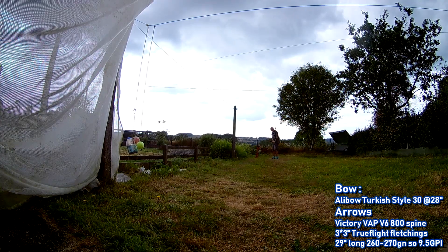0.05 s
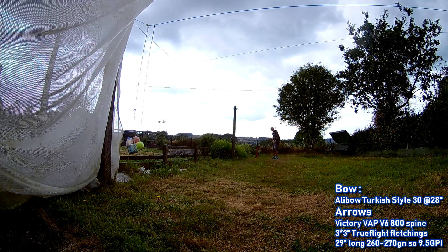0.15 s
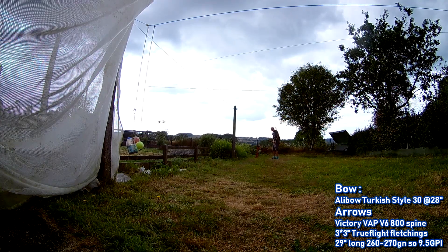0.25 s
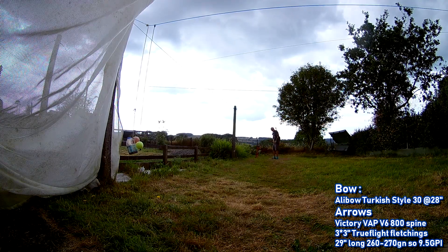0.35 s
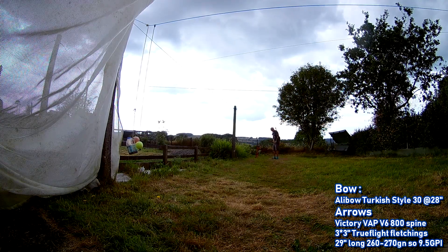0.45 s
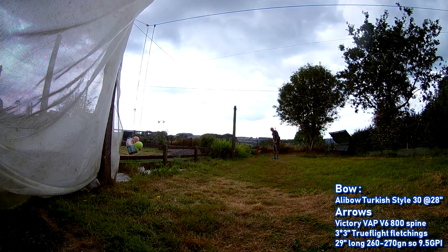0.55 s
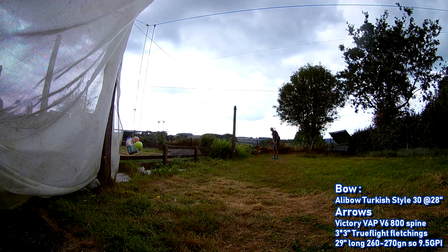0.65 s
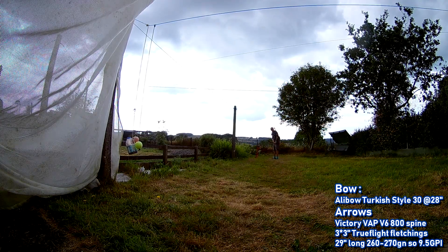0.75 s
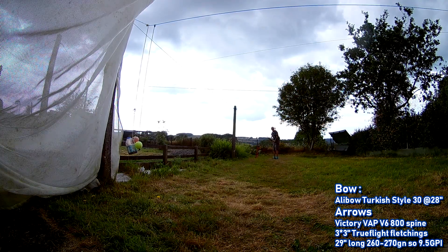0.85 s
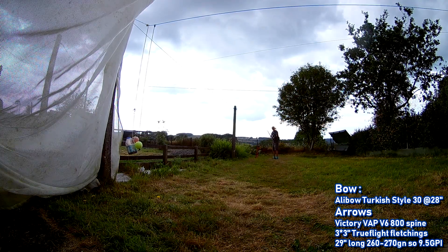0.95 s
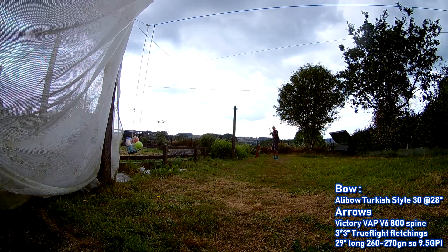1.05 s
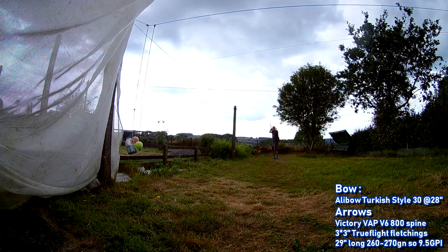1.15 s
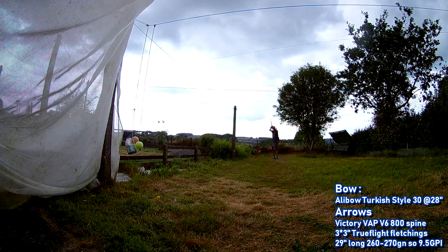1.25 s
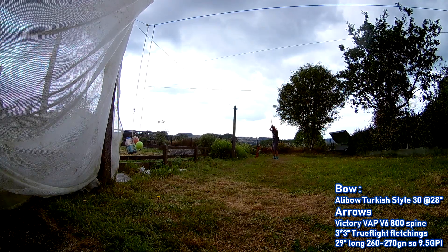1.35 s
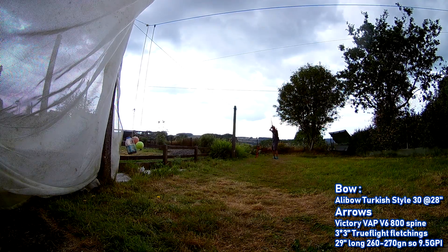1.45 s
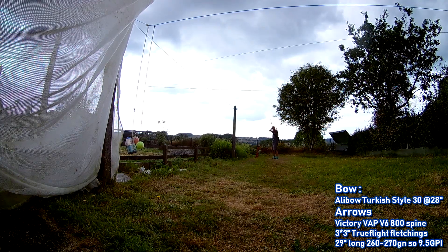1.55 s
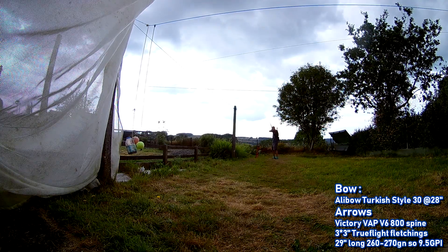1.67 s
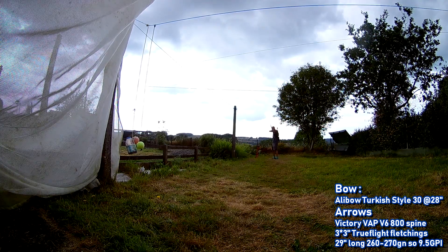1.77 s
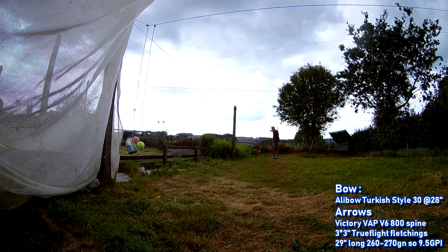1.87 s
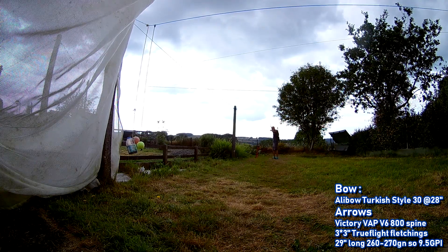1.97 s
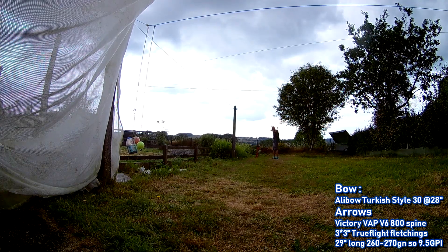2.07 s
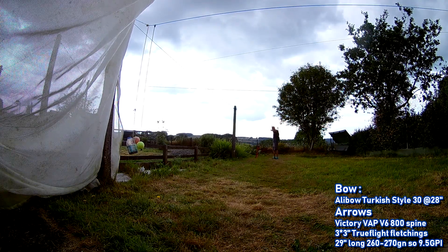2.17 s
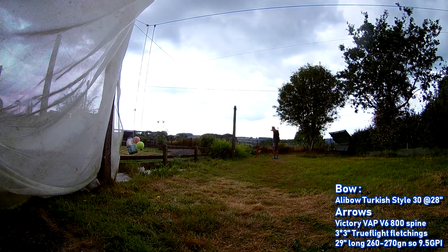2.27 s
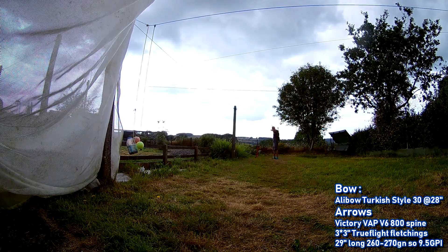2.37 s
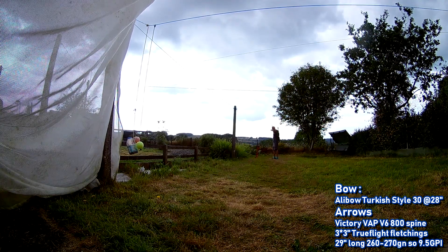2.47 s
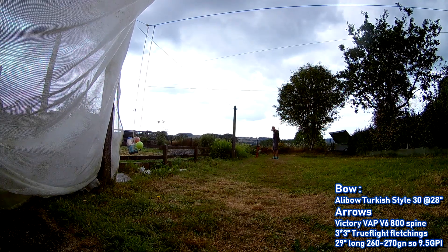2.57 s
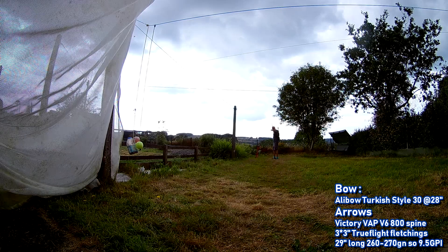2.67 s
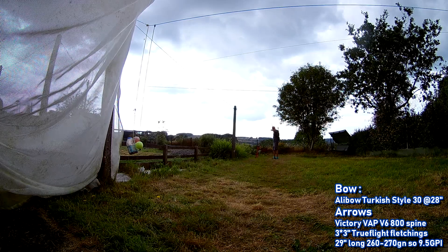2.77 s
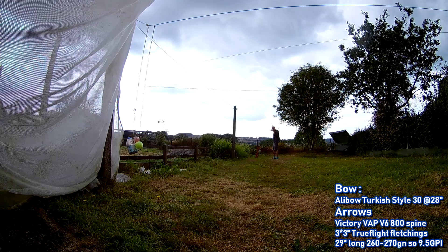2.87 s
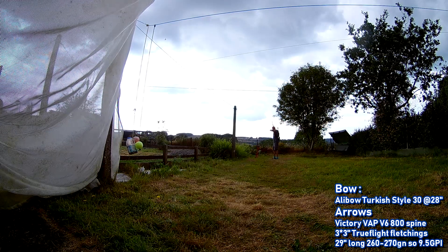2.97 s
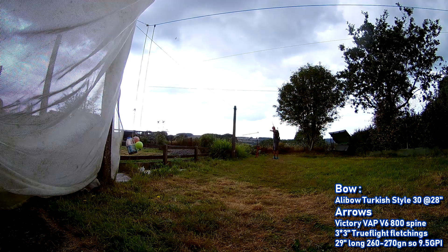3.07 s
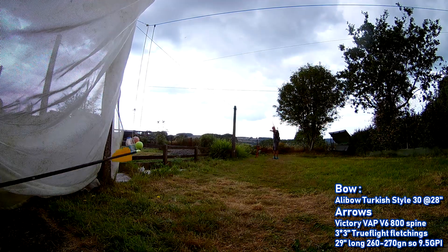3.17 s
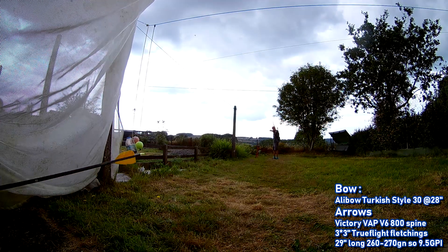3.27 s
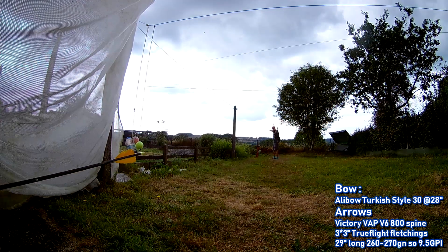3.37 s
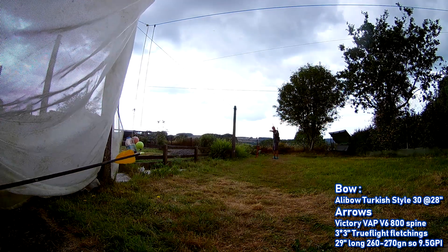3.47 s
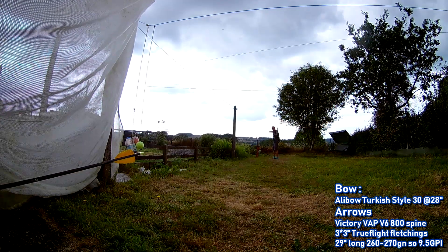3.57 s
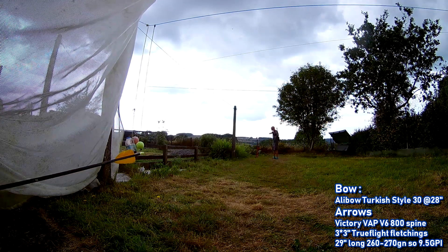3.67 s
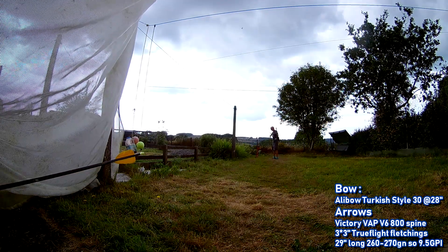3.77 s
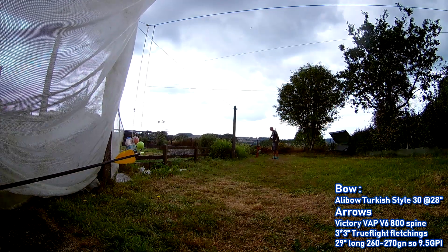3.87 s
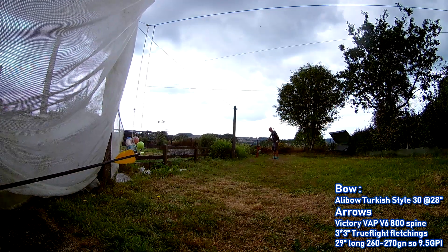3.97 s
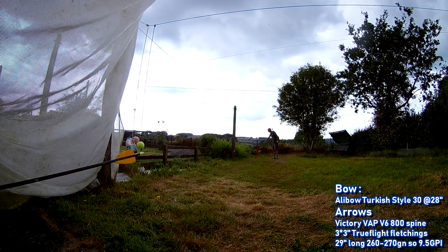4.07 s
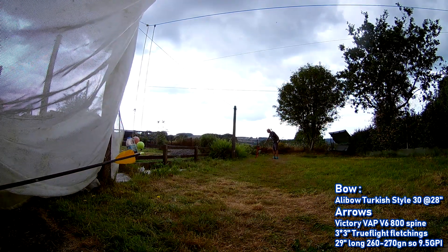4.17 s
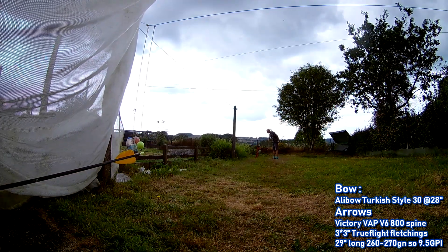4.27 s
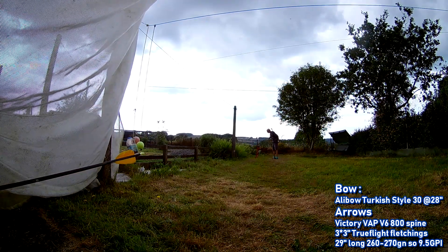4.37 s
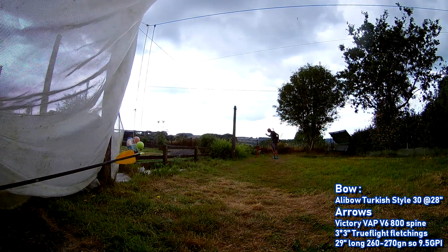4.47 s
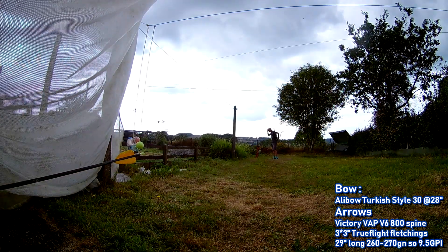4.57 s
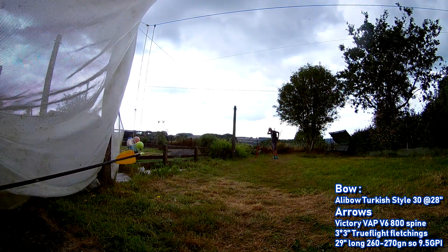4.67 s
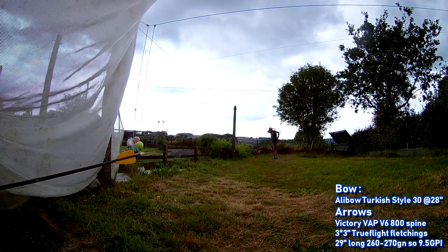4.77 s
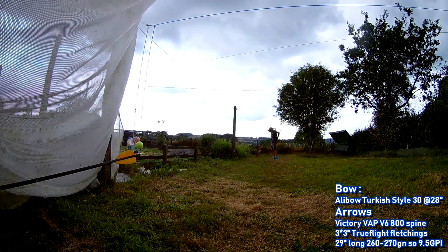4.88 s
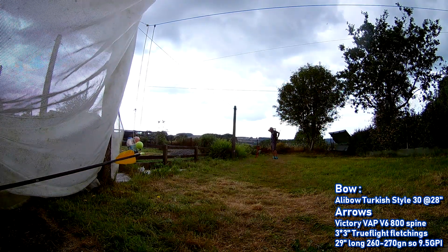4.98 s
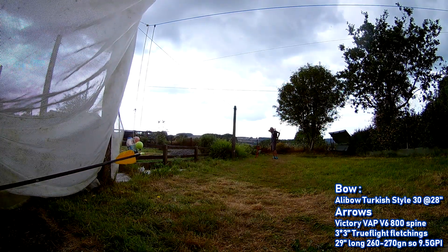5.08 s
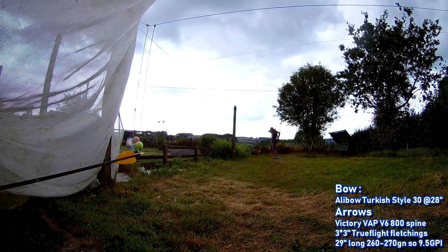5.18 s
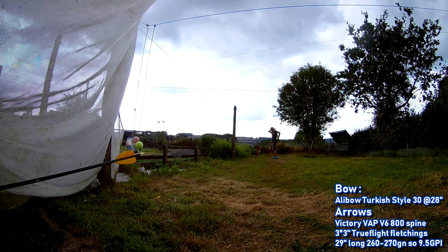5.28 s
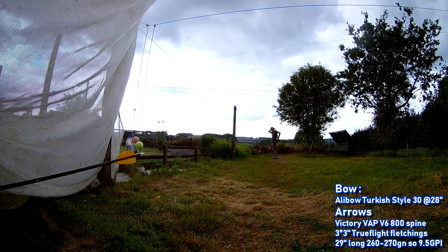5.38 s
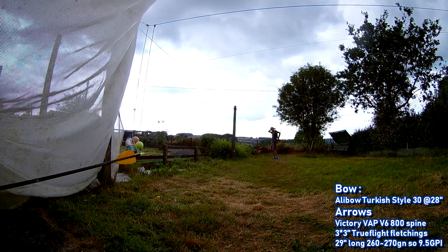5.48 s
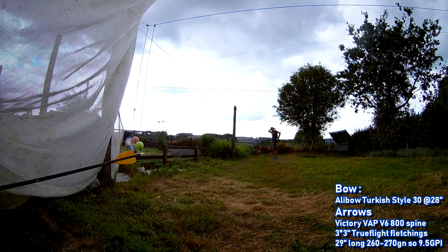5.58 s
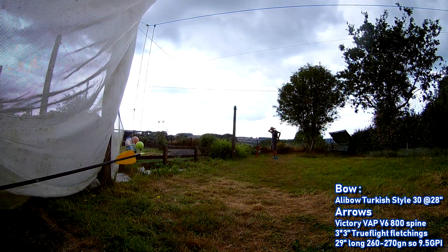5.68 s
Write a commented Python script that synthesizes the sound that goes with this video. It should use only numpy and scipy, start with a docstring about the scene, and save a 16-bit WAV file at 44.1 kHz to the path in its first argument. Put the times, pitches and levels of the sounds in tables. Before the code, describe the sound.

Outdoors, gusts buffet the microphone and fade; a far bow clacks softly and an arrow whirrs in, hitting a nearby target with a violent crack.

```python
"""Gusts rumble on the microphone in the first two seconds and die away, with a few low puffs later;
a distant road and a faint two-note bird go on throughout.
Near 3 s an archer at the far end of a garden looses: struck modes and noise bursts make the bow clack.
The feathers whirr closer as wavering tones and resonant noise that grow with nearness.
The arrow smacks into a target beside the microphone, a noise crack over ringing modes, and overloads it."""
import sys
import numpy as np
from scipy import signal
from scipy.fft import rfft, irfft
from scipy.io import wavfile

SR = 44100
rng = np.random.default_rng(int(sys.argv[2]) if len(sys.argv) > 2 else 0)


def to_wav(sig):
    """Store sig (one row per channel, or 1-D mono) as 16-bit WAV at the path in sys.argv[1].

    Samples outside -1..1 are clipped; the rate is SR.
    """
    pcm = np.clip(np.atleast_2d(sig), -1, 1) * 32767
    pcm = np.round(pcm).astype(np.int16)
    wavfile.write(sys.argv[1], SR, pcm.T)  # frames by channels


N = 252693
T = np.arange(N) / SR  # seconds

# Modes of the target and its stand; heavy parts start to move later.
# Each row: frequency in Hz, level in dB, t60 in seconds, lag after the hit in seconds.
TARGET_MODES = [(36.6, -18, 0.35, 0.012), (108.7, 9.5, 0.043, 0.0063), (88, -9, 0.15, 0.0052),
                (209, -0.5, 0.036, 0.0045), (280, -1.5, 0.078, 0.0053), (330, 5.5, 0.042, 0.00192),
                (413, -18, 0.093, 0.0045), (490, 3, 0.0314, .003), (621, -0.5, 0.044, 0.00059),
                (767, -2.5, 0.038, 0.00043), (982, 9, 0.018, 0.000535), (1220, -13, 0.09, 0.00044),
                (1266, -34, 0.37, 0.00084), (1660, -2, 0.03, 0.00051)]
# Point tearing through the face. Each row: frequency in Hz, relative level in dB.
CRACK_SPECTRUM = [(150, -6.5), (500, -3), (1000, -0.5), (1600, -3), (2050, -18), (2600, -11), (4000, -24),
                  (7000, -24), (11000, -43), (16000, -62)]
# Smack scattered by the garden. Each row: low edge in Hz, high edge in Hz, level in dB, t60 in seconds.
SCATTER_BANDS = [(40, 330, -20.5, 0.25), (198, 350, -22, 0.21), (500, 1660, -12, 0.095),
                 (497, 1540, -38, 0.8), (1900, 3800, -29.5, 0.13), (4200, 6300, -30.5, 0.1),
                 (7500, 8600, -43, .08)]
HIT_S, SCATTER_DELAY_S, ECHO_DELAY_S, ECHO_DB = 3.2015, 0.0032, 0.0145, -14.5

# Modes of the bow limbs. Each row: nominal frequency in Hz, relative level in dB, t60 in seconds.
BOW_MODES = [(220, -7, 0.12), (408, -4, .06), (604, 1, 0.097), (890, 4, 0.044), (1030, -3, 0.036),
             (1284, -2.5, 0.1), (1580, -2, 0.075), (1690, -11, .025)]
# Bright snap of string and nock. Each row: frequency in Hz, relative level in dB.
SNAP_SPECTRUM = [(1500, -8), (2400, -1), (2950, -7), (3600, 5), (4500, 1), (5100, -11), (6200, -8),
                 (7500, -23), (12000, -42)]
# String and shaft clattering on the bow. Each row: time in seconds, relative level in dB.
CLATTER_CONTACTS = [(2.9987, -1), (3.004, -4.5), (3.007, -4.5), (3.0125, -8), (3.0198, -3.5), (3.0243, -5),
                    (3.0278, -9)]
# The nock clicks off the string; bright levels set the snap against the ring of the limbs.
NOCK_S, NOCK_REL_DB, NOCK_BRIGHT_DB, CLATTER_BRIGHT_DB = 2.9822, -14.5, 3, -17
BOW_DB, BOW_WASH_DB = -28.0, -41.0

# Feather whistle. Each row: mean pitch in Hz, level at the hit in dB, time to go at half gain in seconds.
WHISTLE_TONES = [(526, -28, 0.0094), (883, -36.5, 0.068)]
# Air rushing past the feathers.
# Each row: centre in Hz, offset to half gain in Hz, relative level in dB.
FEATHER_RESONANCES = [(800, 860, -1), (3950, 600, -11), (6200, 350, -16)]
RUSH_DB, RUSH_SWELL_S = -41.5, 0.03

# Two-note bird calls. Each row: middle of the first note in seconds, its nominal pitch in Hz,
# its relative level in dB, relative level of the second note in dB.
BIRD_CALL_ROWS = [(.805, 5100, -55, -58), (1.215, 4800, -53, -60), (1.565, 5250, -56, -55),
                  (2.05, 5140, -55, -58), (2.475, 5220, -55, -59), (2.955, 5500, -52, -60),
                  (3.455, 5500, -51, -60), (3.87, 5030, -66, -54), (4.35, 5200, -56, -59),
                  (4.77, 5050, -55, -52), (5.29, 5100, -59, -54)]
NOTE_HALF_S, NOTE_GLIDE, NOTE_WARBLE = 0.06, 0.07, 0.049  # glide and rms warble: shares of the pitch
SECOND_NOTE_DELAY_S, SECOND_NOTE_PITCH_RATIO, BIRD_DB = 0.088, 0.86, -5.0

# Gusts on the microphone. Each row: start in seconds, hold in seconds, rumble level in dB,
# flutter level against the rumble in dB.
GUST_ROWS = [(.1, .01, -38.5, -17), (0.204, 0.094, -35, -13), (0.821, 0.028, -35, -3.5),
             (0.962, .08, -35.5, -14), (1.595, .03, -37.5, -13), (1.679, 0.049, -38.5, -0.5)]
# Low puffs of wind on the microphone.
# Each row: start in seconds, level before the soft onset in dB, pitch in Hz, t60 in seconds.
WIND_PUFFS = [(2.361, -28.5, 92, 0.091), (3.927, -25, 80.7, 0.23), (3.971, -25, 91, 0.16),
              (4.882, -27, 50, 0.068), (4.92, -21.5, 42, 0.083), (4.951, -28, 62, 0.075),
              (4.992, -27.5, 59, 0.072), (5.174, -28, 60, 0.1)]
# Spectrum of the wind rumble. Each row: frequency in Hz, relative level in dB.
WIND_SPECTRUM = [(20, -16), (45, 3), (75, 4), (115, 0.5), (200, -5), (270, -13.5), (330, -12.5), (470, -27),
                 (1000, -40), (4000, -80)]
# Spectrum of the wind flutter. Each row: frequency in Hz, relative level in dB.
FLUTTER_SPECTRUM = [(90, -20), (150, -1.5), (200, 0), (270, -7.5), (340, -6), (480, -17), (900, -20),
                    (2500, -49)]
GUST_ATTACK_S, GUST_T60_S, FLUTTER_T60_S = 0.035, 1.18, 0.35

# Cars on the distant road. Each row: time when nearest in seconds, level when nearest in dB.
CAR_PASSES = [(-.1, -50), (1.25, -54.5), (3.95, -48.5), (5.8, -50)]
# Spectrum of the road. Each row: frequency in Hz, relative level in dB.
ROAD_SPECTRUM = [(250, -12), (450, -7), (650, -4.5), (850, 1), (1150, -1), (1350, -2.5), (1600, -5.5),
                 (2100, -18), (3000, -26.5), (5000, -49)]
# Far droning vehicle. Each row: centre in Hz, offset to half gain in Hz, relative level in dB.
DRONE_RESONANCES = [(990, 37, -7), (1148, 17, -6), (1575, 81, -2), (1740, 280, -5.5)]
# Steady rumble and hiss. Each row: frequency in Hz, relative level in dB.
AIR_SPECTRUM = [(15, -49), (28, -3.5), (53, 1.5), (99, -4.5), (135, -9.5), (200, -10.5), (340, -15),
                (700, -21), (2300, -32), (4200, -36), (8200, -41.5), (11500, -42), (15800, -38.5)]
CAR_PASS_S, ROAD_DB, AIR_DB = 0.62, -52, -41.5  # pass: time from nearest to half power
DRONE_NEAREST_S, DRONE_PASS_S, DRONE_DB = 0.85, 0.38, -50

MIC_LOW_HZ, TOP_HZ = 22.3, 15870


def undb(db):
    """Decibels to gain."""
    return 10 ** (np.asarray(db) / 20)


def noise(gain_at):
    """Noise of rms 1 whose spectrum follows a function of frequency."""
    hz = np.maximum(np.arange(N // 2 + 1) * SR / N, 1)
    x = irfft(rfft(rng.standard_normal(N)) * gain_at(hz), N)
    return x / x.std()


def coloured(points):
    """Noise of rms 1 with a (Hz, dB) spectrum, interpolated over log frequency."""
    hz, db = np.transpose(points)
    return noise(lambda f: undb(np.interp(np.log(f), np.log(hz), db)))


def band(low_hz, high_hz, order=6):
    """Noise of rms 1 between two steep edges."""
    return noise(lambda f: 1 / (1 + (low_hz / f) ** order) / (1 + (f / high_hz) ** order))


def resonance(hz, width_hz):
    """Noise of rms 1 in one resonance."""
    return noise(lambda f: 1 / (1 + ((f - hz) / width_hz) ** 2))


def resonant(rows):
    """Sum of noise resonances."""
    return sum(undb(db) * resonance(hz, width_hz) for hz, width_hz, db in rows)


def waver(rate_hz, depth_db):
    """A gain that wanders at random, with an rms depth in dB."""
    return undb(depth_db * noise(lambda f: np.exp(-f / rate_hz)))


def fade(start_s, t60_s):
    """Silence, then an exponential decay."""
    return (T >= start_s) * np.exp(-np.log(1000) * np.maximum(T - start_s, 0) / t60_s)


def ring(start_s, hz, t60_s):
    """One struck mode: a decaying sine."""
    return fade(start_s, t60_s) * np.sin(2 * np.pi * hz * (T - start_s))


def smack():
    """The point cracks through the face, the target is pushed back and thuds, nearby surfaces answer."""
    bite = 1 - fade(HIT_S, 0.00056)  # the point takes a moment to bite
    crack = undb(1.0) * coloured(CRACK_SPECTRUM) * fade(HIT_S, 0.034) * bite
    body = -sum(undb(db) * ring(HIT_S + lag_s, hz, t60_s) for hz, db, t60_s, lag_s in TARGET_MODES)
    direct = crack + body
    # a small surface close by returns only the middle of the spectrum
    echo_filter = signal.butter(2, [750, 2000], "band", fs=SR, output="sos")
    reflected = signal.sosfilt(echo_filter, direct)
    echo = undb(ECHO_DB) * np.interp(T - ECHO_DELAY_S, T, reflected)
    scatter = sum(undb(db) * band(low_hz, high_hz) * fade(HIT_S + SCATTER_DELAY_S, t60_s)
                  for low_hz, high_hz, db, t60_s in SCATTER_BANDS)
    return direct + echo + scatter


def bow():
    """A quick clatter of contacts rings the limbs; the hedges return a short wash."""
    body, snaps = 0, 0
    snap, rattle = coloured(SNAP_SPECTRUM), band(220, 1800)
    contacts = [(NOCK_S, NOCK_REL_DB, NOCK_BRIGHT_DB)]
    contacts += [(s, db, CLATTER_BRIGHT_DB) for s, db in CLATTER_CONTACTS]
    for s, db, bright_db in contacts:
        detune = 1 + 0.022 * rng.standard_normal(len(BOW_MODES))
        limbs = sum(undb(mode_db) * ring(s, hz * ratio, t60_s)
                    for (hz, mode_db, t60_s), ratio in zip(BOW_MODES, detune))
        # each contact is a short dull push
        push = undb(5) * ring(s, 420 * detune[0], 0.004)
        knock = push + undb(4.5) * rattle * fade(s, 0.024)
        body = body + undb(db) * (limbs + knock)
        snaps = snaps + undb(db + bright_db) * snap * fade(s, 0.038)
    # soft contacts round off the start of each ring
    body = signal.sosfilt(signal.butter(2, 2800, fs=SR, output="sos"), body)
    wash = (rattle + undb(-12.5) * snap) * fade(3.025, 0.46)
    return undb(BOW_DB) * (body + snaps) + undb(BOW_WASH_DB) * wash


def flight():
    """The feathers whistle and hiss louder as the arrow closes in, and stop when it lands."""
    to_go_s = np.maximum(HIT_S - T, 0)
    flying = np.clip((T - 3.05) / 0.11, 0, 1) * (T < HIT_S)
    flutter = 1 + 0.0122 * noise(lambda f: np.exp(-f / 60))
    flutter_time_s = np.cumsum(flutter) / SR  # unsteady clock shared by the tones
    whistle = sum(undb(db) * np.sin(2 * np.pi * hz * flutter_time_s) / (1 + to_go_s / swell_s)
                  for hz, db, swell_s in WHISTLE_TONES)
    rush = undb(RUSH_DB) * resonant(FEATHER_RESONANCES) / (1 + to_go_s / RUSH_SWELL_S)
    return (whistle + rush) * flying


def bird_note(middle_s, hz, db, warble):
    """A sine sliding up with an unsteady pitch, under a smooth swell."""
    progress = np.clip((T - middle_s) / NOTE_HALF_S, -1, 1)
    pitch_hz = hz * (1 + NOTE_GLIDE * progress + NOTE_WARBLE * warble)
    swell = np.cos(np.pi * progress / 2) ** 4
    return undb(db) * swell * np.sin(2 * np.pi * np.cumsum(pitch_hz) / SR)


def bird():
    """A faint bird repeats a high note and a lower one, with a level that flickers."""
    calls, warble = 0, noise(lambda f: np.exp(-f / 300))
    for s, hz, first_db, second_db in BIRD_CALL_ROWS:
        calls = calls + bird_note(s, hz, first_db, warble)
        second_hz = hz * SECOND_NOTE_PITCH_RATIO
        calls = calls + bird_note(s + SECOND_NOTE_DELAY_S, second_hz, second_db, warble)
    return undb(BIRD_DB) * calls * waver(60, 2.8)


def gust(start_s, hold_s, t60_s):
    """Gain of a gust: a quick rise, a hold and a dying away."""
    past_hold_s = np.maximum(T - start_s - GUST_ATTACK_S - hold_s, 0)
    return np.clip((T - start_s) / GUST_ATTACK_S, 0, 1) * undb(-60 * past_hold_s / t60_s)


def wind():
    """Gusts rumble on the microphone with a shorter-lived flutter; brief puffs bump as low soft modes."""
    force = sum(undb(db) * gust(s, hold_s, GUST_T60_S) for s, hold_s, db, _ in GUST_ROWS)
    flutter = sum(undb(db + flutter_db) * gust(s, hold_s, FLUTTER_T60_S)
                  for s, hold_s, db, flutter_db in GUST_ROWS)
    gusts = coloured(WIND_SPECTRUM) * force + coloured(FLUTTER_SPECTRUM) * flutter
    puffs = sum(undb(db) * ring(s, hz, t60_s) * (1 - fade(s, 0.014)) for s, db, hz, t60_s in WIND_PUFFS)
    return gusts * waver(25, 2.1) + puffs


def passing(nearest_s, pass_s):
    """Gain of a source that moves by in a straight line: one over its distance."""
    return 1 / np.hypot(1, (T - nearest_s) / pass_s)


def background():
    """Tyre noise swells as cars pass on a distant road; one droning vehicle, low rumble and thin hiss."""
    car_power = sum((undb(db) * passing(s, CAR_PASS_S)) ** 2 for s, db in CAR_PASSES)
    traffic = np.sqrt(undb(ROAD_DB) ** 2 + car_power)
    road = coloured(ROAD_SPECTRUM) * traffic * waver(2.5, 1.0)
    vehicle = resonant(DRONE_RESONANCES) * undb(DRONE_DB) * passing(DRONE_NEAREST_S, DRONE_PASS_S)
    return road + vehicle + undb(AIR_DB) * coloured(AIR_SPECTRUM)


def scene():
    """Everything at the one microphone."""
    return (smack() + bow() + flight() + bird() + wind() + background())[None]


def record(dry):
    """The microphone sheds the deepest bass; peaks clip flat at full scale; the top is cut."""
    bass_cut = signal.butter(1, MIC_LOW_HZ, "high", fs=SR, output="sos")
    clipped = np.clip(signal.sosfilt(bass_cut, dry), -1, 1)
    top_cut = signal.ellip(14, 0.05, 80, TOP_HZ, fs=SR, output="sos")
    return signal.sosfilt(top_cut, clipped)


dry = scene()
out = record(dry)
to_wav(out)
```